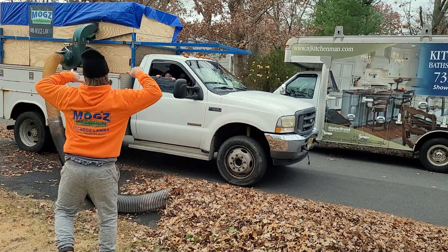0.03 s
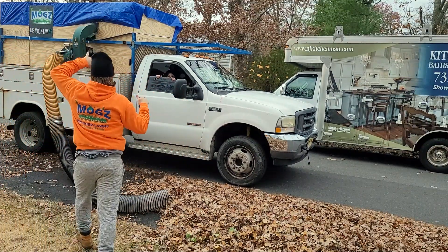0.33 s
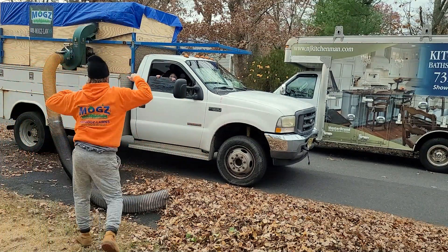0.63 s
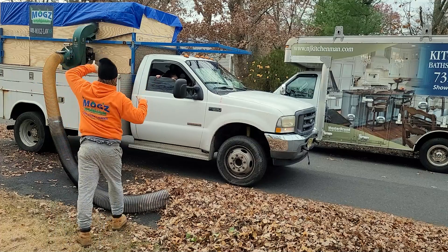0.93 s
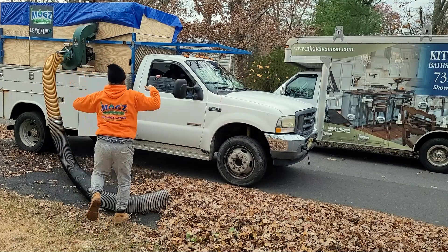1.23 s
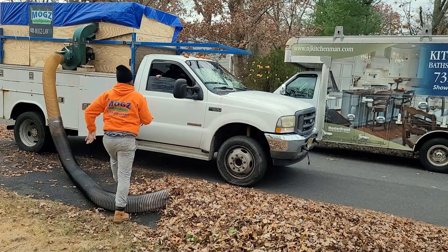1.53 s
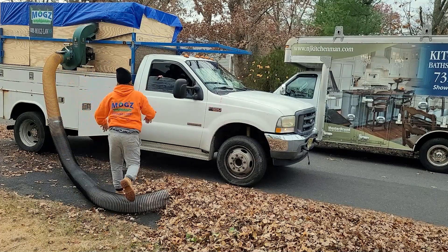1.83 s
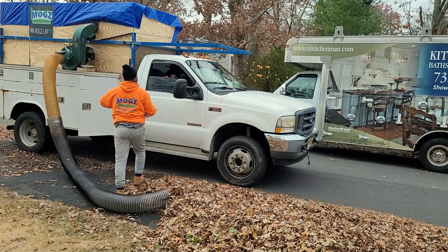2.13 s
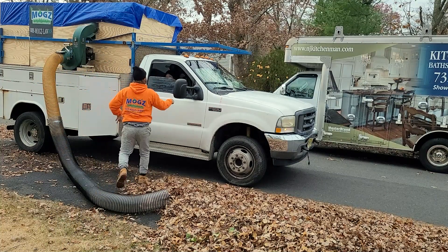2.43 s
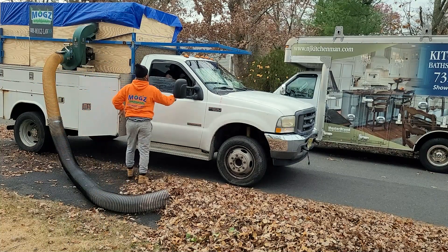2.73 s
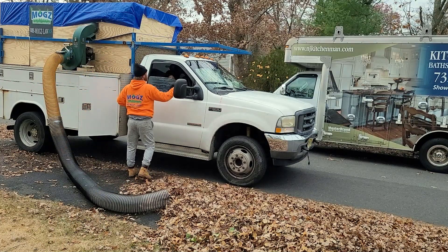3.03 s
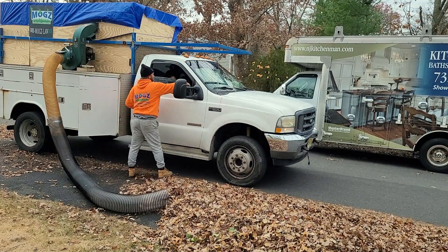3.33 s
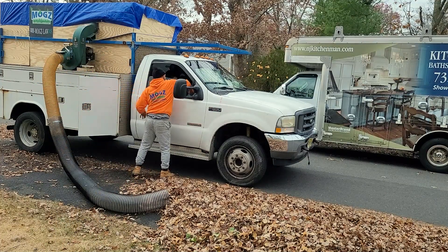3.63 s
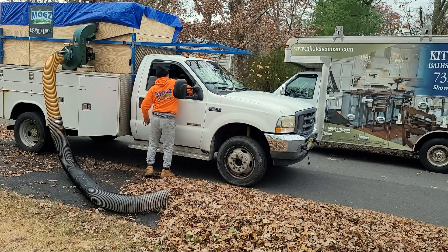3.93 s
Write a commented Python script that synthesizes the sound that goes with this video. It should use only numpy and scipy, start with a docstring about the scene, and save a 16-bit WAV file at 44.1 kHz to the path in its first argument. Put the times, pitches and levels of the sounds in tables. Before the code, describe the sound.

A leaf loader runs outdoors, its pulsing engine drone and rushing air getting louder.

```python
"""Outdoors, a leaf loader on a truck runs at a steady 3250 rpm and grows louder.
The exhaust throbs as the engine fires, and the fan (the impeller) drones at the rate its blades pass.
Air roars through housing and hose under a steady hiss. A sharp tick on every engine cycle
sets thin metal ringing. All of these sound together from the start."""
import sys
import numpy as np
from scipy import signal
from scipy.fft import rfft, irfft
from scipy.io import wavfile
from scipy.ndimage import uniform_filter1d

SR = 44100
rng = np.random.default_rng(int(sys.argv[2]) if len(sys.argv) > 2 else 0)


def wav_record(signal):
    """Record a signal, one row per channel, as 16-bit PCM in the file named by sys.argv[1]."""
    frames = np.transpose(np.atleast_2d(signal))
    bounded = np.clip(frames, -1, 1)
    # unit amplitude maps onto the largest positive 16-bit level
    quanta = np.round(bounded * 32767).astype(np.int16)
    wavfile.write(sys.argv[1], SR, quanta)


N = 176400
TIME, BIN_HZ = np.arange(N) / SR, np.arange(N // 2 + 1) * SR / N

# Levels in the tables are relative: the functions set how loud each layer is.
# how often the engine fires, once per two turns of the shaft: t/s, f/Hz
FIRING_RATE = [(0, 27.02), (.5, 27.005), (1.25, 27.03), (1.7, 27.06), (2, 27.03), (2.4, 27.055), (3, 27.12),
               (3.25, 27.075), (3.55, 26.99), (4, 27)]
# exhaust tones: multiple of the firing rate, level/dB
EXHAUST_TONES = [(1, -37), (2, -14.5), (3, -28), (4, -8.3), (5, -18.5), (6, -26), (7, -32), (9, -19),
                 (10, -18), (12, -26), (13, -20), (14, -26), (20, -33), (22, -30), (27, -28), (29, -30),
                 (30, -28), (33, -31), (34, -35), (35, -32), (36, -28.5), (37, -31), (39, -32), (41, -28),
                 (42, -31), (46, -32), (52, -32), (55, -34), (61, -35)]
# exhaust loudness: t/s, level/dB
EXHAUST_LEVEL = [(0, -8.5), (.7, -7), (1.4, -5), (2.1, -1.8), (2.8, -.8), (3.35, -.8), (3.7, 1.1), (4, 1.1)]
# fan tones: multiple of the blade rate, level/dB
FAN_TONES = [(1, 0), (2, -12.8), (3, -25), (4, -35), (5, -15.5), (6, -28), (7, -31)]
# fan loudness: t/s, level/dB
FAN_LEVEL = [(0, -12.5), (.3, -11), (.75, -8.5), (1.25, -7.5), (1.6, -5), (2, -5.5), (2.35, -2.7),
             (3, -1.5), (3.5, -2.3), (4, -1.5)]
# tone colour of the air in housing and hose: f/Hz, level/dB
ROAR_COLOUR = [(20, -23), (36, -11), (62, 0.5), (90, -3), (170, -6.5), (260, -1.5), (380, 0.5), (438, -2.5),
               (470, -8.5), (495, -7.5), (560, -6.5), (620, -9), (770, -4), (900, -13.5), (1300, -10),
               (1600, -13), (1730, -15.5), (1900, -13), (2100, -12.5), (2500, -18), (3200, -22),
               (6000, -82)]
# roar loudness: t/s, level/dB
ROAR_LEVEL = [(0, -39.5), (.7, -36.5), (1.3, -33.5), (1.75, -31), (2.05, -30.5), (2.35, -29.5), (2.85, -27),
              (3.4, -28), (4, -28)]
# rise shared by housing, hiss, chatter and metal: t/s, level/dB
SWELL = [(0, -10.5), (.7, -8), (1.3, -6), (1.7, -3), (2.05, -3.5), (2.35, -2.5), (3, 0), (3.5, -0.9),
         (4, 2)]
# tone colour of the hiss: f/Hz, level/dB
HISS_COLOUR = [(1200, -21), (2600, -3), (3100, -1), (4000, -3.5), (4700, -7.5), (6250, -2.3), (7400, -8),
               (8600, -4), (9400, -6.3), (10200, -7.5), (11000, -12.5), (11800, -9.5), (12500, -6.3),
               (15700, -7)]
# tone colour of the tick: f/Hz, level/dB
TICK_COLOUR = [(1500, -12), (3000, -8.5), (4000, -9), (4700, -9.5), (6200, -3.5), (7400, -7), (8600, -3.2),
               (10000, -8.5), (11300, -9), (12800, -1.2), (14700, -1.2), (15700, -3.5)]
# tick loudness: t/s, level/dB
TICK_LEVEL = [(0, -19), (0.25, -15.5), (0.5, -15.5), (0.8, -11.5), (1.3, -10.5), (1.65, -6.5), (2.15, -6),
              (2.36, -7), (2.52, -4.5), (3.0, -5.5), (3.3, -8), (3.45, -5.5), (3.56, -4), (3.82, -5),
              (4, -4.5)]
# cycles that tick harder: t/s, boost/dB
HARD_TICKS = [(1.635, 2), (1.672, 2), (1.783, 1.5), (1.967, 2), (2.078, 2), (2.3, 2), (2.337, 5.5),
              (2.374, 3), (2.411, 4), (2.78, 2), (3.223, 2), (3.371, 2.5), (3.519, 2.5), (3.741, 2),
              (3.815, 4), (3.889, 4.5)]
# notes of the thin metal: f/Hz, width/Hz, level/dB
METAL_NOTES = [(1648, 5, -54), (8134, 42, -51.5), (8979, 62, -48.7), (9650, 90, -59), (10449, 70, -58),
               (11274, 60, -63), (12200, 110, -55), (14600, 90, -57), (15150, 100, -56)]
# moments when the strongest note sings out: t/s, boost/dB
FLARES = [(.235, 10), (2.19, 4), (2.32, 4), (2.7, 2.5), (2.86, 5), (3.24, 4), (3.62, 4)]
# how much louder the left side is than the right: f/Hz, level/dB
BALANCE = [(60, -0.5), (110, -0.5), (200, 0.1), (380, 1.0), (700, 4.0), (1290, 4.5), (2380, 0.4),
           (4400, 1.9), (8120, 6.0), (15000, 0)]
# how far the right side lags the left: f/Hz, phase/rad
RIGHT_LAG = [(0, 0), (700, 1.2), (1500, 1.9), (4000, 4.3), (5400, 5.1), (6300, 6.4), (7400, 9.3),
             (9000, 7.3), (9700, 9), (11000, 9.3), (15000, 13.6)]
# how alike the noise is on both sides: f/Hz, likeness from 0 to 1
LIKENESS = [(40, .97), (100, .985), (250, .96), (500, .9), (900, .9), (3000, .86), (4500, .52), (6200, .6),
            (7400, .4), (9000, .52), (15000, .42)]


def undb(db):
    """Turn decibels into a gain."""
    return 10 ** (np.asarray(db) / 20)


def unit(x):
    """Scale a signal to an average power of 1."""
    return x / np.sqrt(np.mean(x ** 2))


def curve(rows):
    """Join a table's points with straight lines in time."""
    return np.interp(TIME, *np.array(rows, float).T)


def over_hz(rows, hz=BIN_HZ):
    """Join a table's points along a scale of octaves."""
    points, value = np.array(rows, float).T
    return np.interp(np.log(hz + 1e-3), np.log(points), value)


def wander(rate_hz):
    """A smooth random wobble around zero."""
    hold = max(int(SR / rate_hz), 2)
    steps = rng.standard_normal(2000)[np.arange(N) // hold % 2000]
    return 0.71 * uniform_filter1d(uniform_filter1d(steps, hold), hold)


def stereo(hz):
    """How strongly and how late each frequency reaches left and right."""
    lean = undb(np.array([[1], [-1]]) * over_hz(BALANCE, hz) / 2)
    lag = np.array([[0], [1]]) * np.interp(hz, *np.array(RIGHT_LAG, float).T)
    return lean / np.sqrt(np.mean(lean ** 2, axis=0)) * np.exp(-1j * lag)


def resonance(centre_hz, width_hz):
    """A tone colour with a single peak."""
    return 1 / (1 + (2 * (BIN_HZ - centre_hz) / width_hz) ** 2)


def noise(colour):
    """Stereo noise of a given colour; the two sides are less alike in the treble."""
    like = np.clip(over_hz(LIKENESS), 0, 1)
    shared, side = rfft(rng.standard_normal((2, N)))
    side = side * np.sqrt(1 - like) * np.array([[1], [-1]])
    return unit(irfft(colour * stereo(BIN_HZ) * (shared * np.sqrt(1 + like) + side), N))


def tones(cycles, rows, waver):
    """Tones locked to the shaft; the weaker ones waver more in level."""
    total, base_hz = 0, cycles[-1] * SR / N
    for multiple, db in rows:
        waver_db = waver * (2 + abs(db) / 10) * wander(rate_hz=7)
        tone = undb(db + waver_db) * np.exp(2j * np.pi * (multiple * cycles + rng.random()))
        total = total + (stereo(multiple * base_hz) * tone).real
    return np.sqrt(2) * total


def exhaust(cycles):
    """The firings make a low throb, and rushing gas makes the pipe hum."""
    throb = undb(-20.5 + curve(EXHAUST_LEVEL)) * tones(cycles, EXHAUST_TONES, waver=.75)
    pipe = undb(-42) * noise(resonance(centre_hz=270, width_hz=45))
    return throb + pipe


def fan(cycles, blades_per_cycle=8):
    """Each passing blade pushes the air; the pushes blend into a drone."""
    return undb(-19.4 + curve(FAN_LEVEL)) * tones(cycles * blades_per_cycle, FAN_TONES, waver=.3)


def airflow(cycles):
    """Rushing air roars, swells with each firing and rings in the fan housing."""
    throb = 1 + .17 * np.cos(2 * np.pi * (cycles - .69))
    roar = noise(undb(over_hz(ROAR_COLOUR))) * throb * undb(1.5 + curve(ROAR_LEVEL))
    housing = noise(resonance(centre_hz=425, width_hz=50)) * undb(-37.5 + curve(SWELL))
    return roar + housing


def hiss():
    """The air also hisses, flickering a little as it grows."""
    colour = undb(over_hz(HISS_COLOUR))
    return noise(colour) * undb(-35 + .97 * curve(SWELL) + 1.5 * wander(rate_hz=13))


def ticks(cycles):
    """One sharp tick a cycle, a softer rattle just behind it, and loose chatter in between."""
    count, phase = cycles.astype(int), cycles % 1
    # each cycle gets its own random numbers
    force, rattle_force, timing, length = rng.standard_normal((200, 4))[count].T
    accent = undb(sum(db * (count == count[min(int(t * SR), N - 1)]) for t, db in HARD_TICKS))
    tick_at, rise, fall, rattle_at, rattle_width = .135, .028, .12, .3, .05  # shares of a cycle
    since_tick = phase - tick_at - .008 * timing
    attack = np.exp(-.5 * accent * (np.minimum(since_tick, 0) / rise) ** 2)
    decay = np.exp(-np.maximum(since_tick, 0) / (fall * np.exp(.2 * length)))
    tick = attack * decay * accent * undb(.8 * force)
    rattle = np.exp(-.5 * ((phase - rattle_at) / rattle_width) ** 2) * undb(-9 + 2.5 * rattle_force)
    strength = undb(-19 + curve(TICK_LEVEL) + .07 * wander(rate_hz=9.3))
    chatter = undb(-43.5 + curve(SWELL) / 2 + 4 * wander(rate_hz=160))
    loudness = np.hypot(np.hypot(tick, rattle) * strength, chatter)  # their powers add up
    return noise(undb(over_hz(TICK_COLOUR))) * loudness


def metal_ringing(cycles, singing_hz=8979, flare_s=.025):
    """Thin metal rings, a bit louder after each tick; its strongest note sings out now and then."""
    flare_db = sum(db * np.exp(-.5 * ((TIME - t) / flare_s) ** 2) for t, db in FLARES)
    notes, sides = 0, stereo(BIN_HZ)
    for hz, width_hz, db in METAL_NOTES:
        spectrum = sides * rfft(rng.standard_normal(N)) * resonance(hz, width_hz)
        notes = notes + undb(db + flare_db * (hz == singing_hz)) * unit(irfft(spectrum, N))
    pulse = 1 + .19 * np.cos(2 * np.pi * (cycles - .3))
    return notes * pulse * undb(.59 * curve(SWELL) - wander(rate_hz=6.5))


def scene():
    """Count the slightly uneven engine cycles; every layer but the hiss keeps time with them."""
    cycles = np.abs(np.cumsum(curve(FIRING_RATE)) / SR + .0008 * wander(rate_hz=24.88))
    drone = exhaust(cycles) + fan(cycles)
    return drone + airflow(cycles) + hiss() + ticks(cycles) + metal_ringing(cycles)


def record(dry):
    """Cut the treble steeply above 15750 Hz."""
    return signal.sosfilt(signal.ellip(12, .2, 80, 15750, fs=SR, output="sos"), dry)


dry = scene()
out = record(dry)
wav_record(out)
```